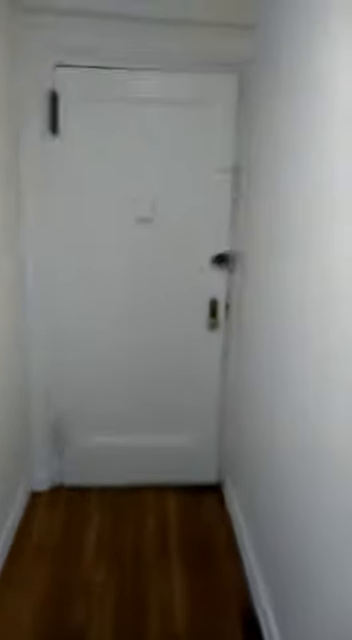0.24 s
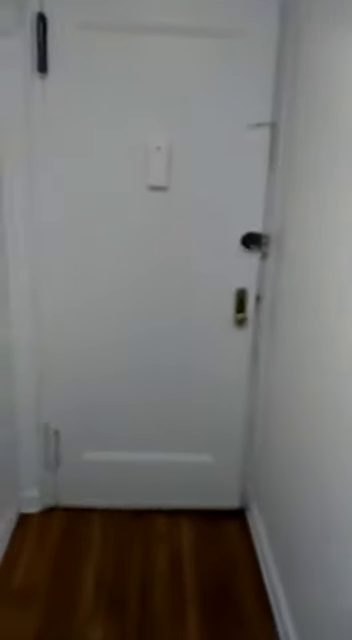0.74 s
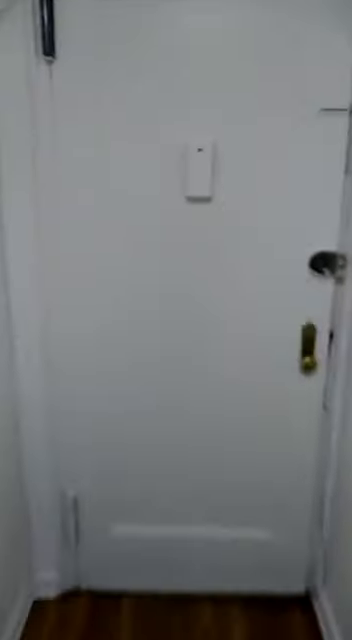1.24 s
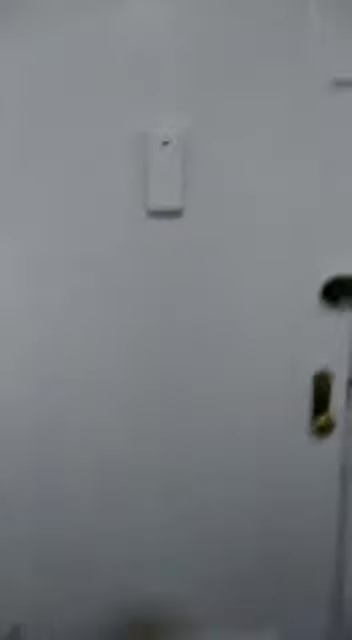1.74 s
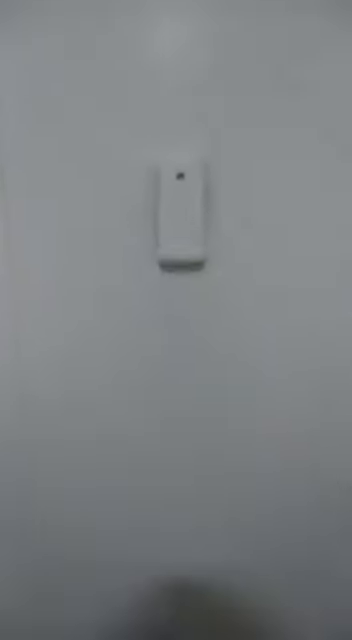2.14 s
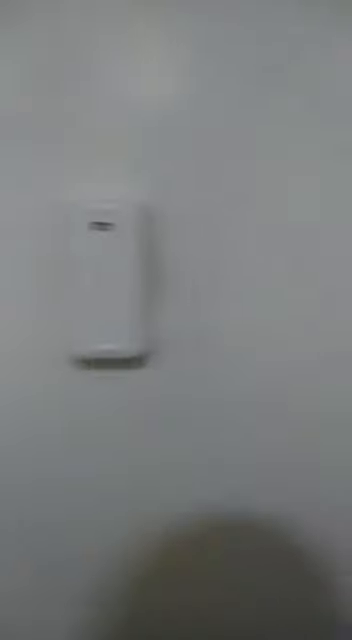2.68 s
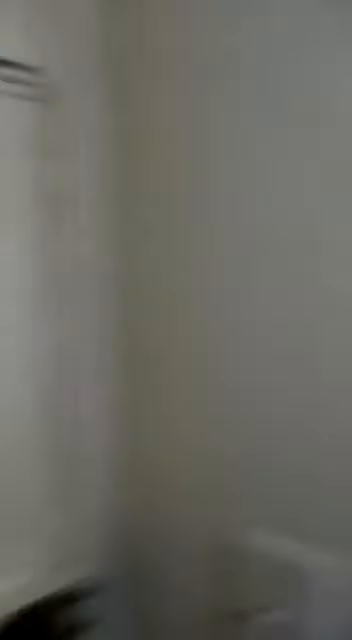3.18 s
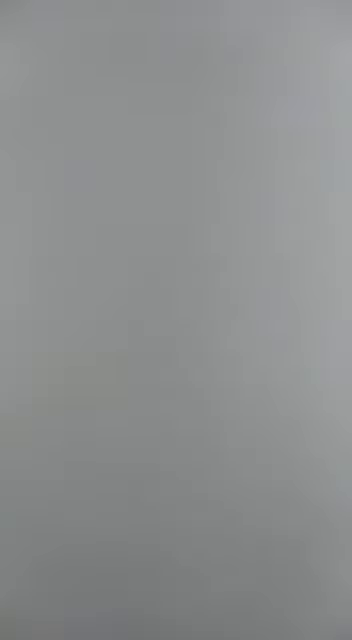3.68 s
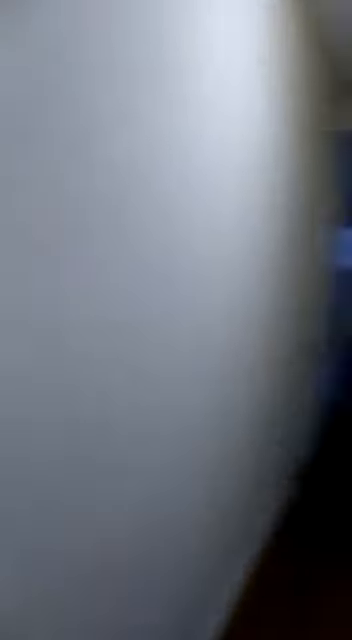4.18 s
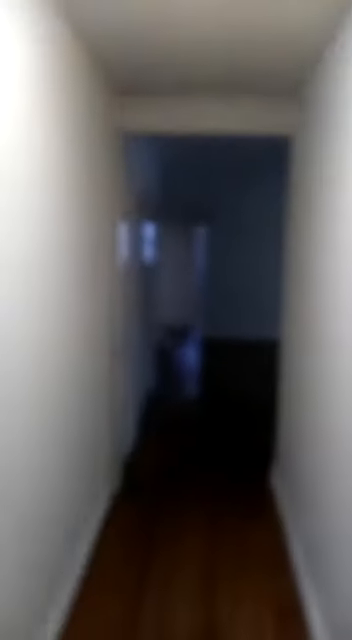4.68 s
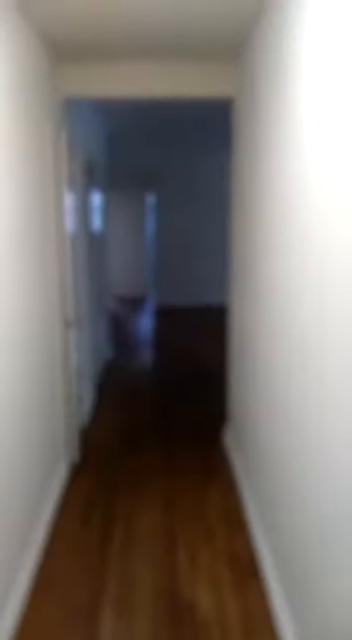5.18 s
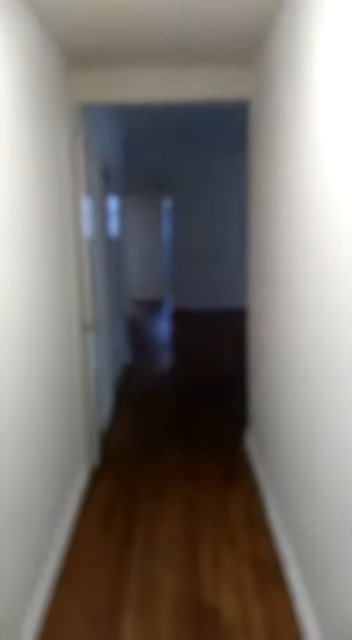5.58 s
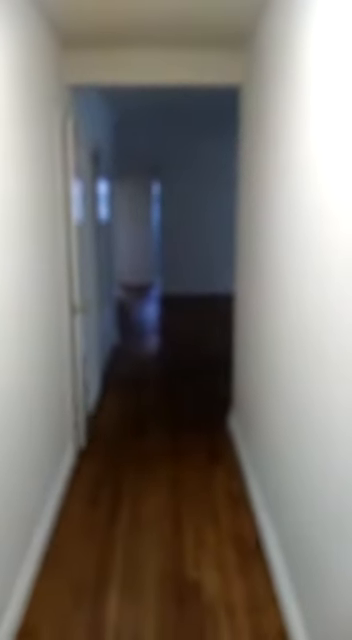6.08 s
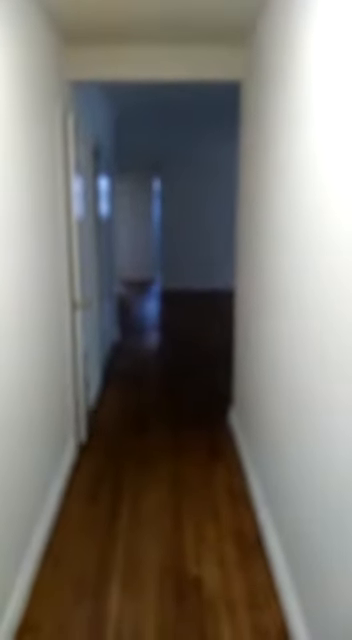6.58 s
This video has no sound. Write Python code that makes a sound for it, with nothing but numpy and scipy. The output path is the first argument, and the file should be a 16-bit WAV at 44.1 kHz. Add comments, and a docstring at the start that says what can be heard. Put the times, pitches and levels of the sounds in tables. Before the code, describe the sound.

Footsteps thump and scuff along a hardwood hallway with clinking keys, then stop; a few close clicks and a sharp metal snap follow.

```python
"""Footsteps go down a bare hardwood hallway, turn and stop; a few sharp clicks follow close by.
Each step thumps the boards with heel, then ball; the shoe knocks and scuffs, the boards crack,
clothes swish and small metal, probably keys, clinks. A finger rubs a handled object, then a metal
catch rattles and snaps, buzzing and ringing. Machinery in the building rumbles underneath."""
import sys
import numpy as np
from scipy import signal
from scipy.io import wavfile
from scipy.ndimage import uniform_filter1d

SR = 44100
rng = np.random.default_rng(int(sys.argv[2]) if len(sys.argv) > 2 else 0)


def dump(signal):
    """Clip the signal to [-1, 1] and save it as 16-bit WAV at the path in sys.argv[1]."""
    limited = np.clip(np.atleast_2d(signal).T, -1, 1)
    pcm = np.round(limited * 32767).astype(np.int16)
    wavfile.write(sys.argv[1], SR, pcm)


N = 301070
TIME = np.arange(N) / SR
HIT_TIME = TIME[:SR // 2]

# Footsteps. Each row: start in s, heel-to-ball roll in s, heel level in dB, ball level in dB,
# push pitch in Hz, heel softness (1 = usual), ball softness, floor tremor in dB.
STEPS = [(0.0, 0.086, -17.5, -25, 117, 0.21, 0.67, -47), (0.592, 0.1, -28.5, -28, 141.4, 1.07, 0.85, -43),
         (1.181, 0.108, -25.5, -24, 138, 0.83, 1.24, -40),
         (1.843, 0.12, -17.5, -30, 138.5, 1.25, 1.27, -42.5),
         (2.753, 0.043, -30.5, -20, 150.6, 0.63, 0.86, -47),
         (3.429, 0.21, -32, -23.5, 152.2, 1.2, 0.61, -45)]
# Spectrum of a contact on wood. Each row: frequency in Hz, gain in dB.
WOOD_SPECTRUM = [(40, -30.5), (100, -4), (250, 15), (355, 20), (480, 8), (720, 6.5), (1000, 3.5),
                 (1400, 3.5), (2600, -5.5), (4500, -1), (6500, -9.5), (7400, -14.5), (8200, -28.5),
                 (11000, -30), (16000, -53.5)]
# Spectrum of rubbing cloth. Each row: frequency in Hz, gain in dB.
CLOTH_SPECTRUM = [(1200, -38), (2000, -13.5), (2700, -7.5), (3600, -4), (4900, 0), (6100, -9.5),
                  (6900, -22), (7700, -24.5), (9000, -38)]


def amp(db):
    """Decibels to gain."""
    return 10 ** (np.asarray(db) / 20)


def unit_rms(x):
    """Scales to rms 1."""
    return x / np.sqrt(np.mean(x ** 2) + 1e-20)


def at_peak(x, db):
    """Scales to a peak level."""
    return amp(db) * x / abs(x).max()


def lookup(points, hz):
    """Interpolates a table on a log-frequency axis."""
    point_hz, value = np.transpose(points)
    return np.interp(np.log(hz + 1), np.log(point_hz + 1), value)


def add(mix, start_s, sound):
    """Mixes a sound in at start_s."""
    part = mix[max(round(start_s * SR), 0):][:len(sound)]
    part += sound[:len(part)]


def band_db(hz, centre_hz, octaves):
    """Bell on the octave axis: the band one contact excites."""
    return np.maximum(-6 * (np.log2((hz + 1) / centre_hz) / octaves) ** 2, -45)


def colour(x, spectrum, centre_hz=None, octaves=1):
    """Minimum-phase filter with the given spectrum, optionally weighted round a centre."""
    hz = abs(np.fft.fftfreq(8192, 1 / SR))
    db = lookup(spectrum, hz)
    if centre_hz is not None:
        db = db + band_db(hz, centre_hz, octaves)
    log_gain = np.log(amp(np.maximum(db, db.max() - 90)))
    taps = np.fft.ifft(np.exp(np.conj(signal.hilbert(log_gain)))).real
    return signal.oaconvolve(x, taps[:len(taps) // 2])[:len(x)]


def small_body(x, cutoff_hz=2200):
    """A small object radiates almost no bass."""
    return signal.sosfilt(signal.butter(8, cutoff_hz, "highpass", fs=SR, output="sos"), x)


def decay(t60_s):
    """Envelope that loses 60 dB in t60_s."""
    return np.exp(-np.log(1000) * HIT_TIME / max(t60_s, 1e-3))


def rise(t60_s):
    """Exponential attack from 0 to 1."""
    return 1 - decay(t60_s)


def swell(full_s, rise_s, hold_s, fall_db_per_s):
    """Envelope that rises until full_s, holds, then dies away."""
    attack = np.clip((TIME - full_s) / rise_s + 1, 0, 1) ** 2
    return attack * amp(-fall_db_per_s * np.maximum(TIME - full_s - hold_s, 0))


def ring(modes, detune=0):
    """Struck body: decaying sines, shifted a little by where it is hit."""
    out = np.zeros(len(HIT_TIME))
    for hz, db, t60_s in modes:
        shifted_hz = hz * (1 + detune * rng.uniform(-0.75, 1))
        out += amp(db) * decay(t60_s) * np.sin(2 * np.pi * shifted_hz * HIT_TIME)
    return out


def grit(grain_db, size=len(HIT_TIME)):
    """Friction noise: countless tiny slips of uneven size."""
    return unit_rms(rng.standard_normal(size) * amp(grain_db * np.minimum(rng.exponential(1, size), 5)))


def click(chatter_db, t60_s):
    """One hard contact, then brief chatter."""
    return signal.unit_impulse(len(HIT_TIME)) + amp(chatter_db) * grit(grain_db=4.5) * decay(t60_s)


def patchy(x, depth_db):
    """Narrow resonances come and go as the walker moves."""
    hz, _, bands = signal.stft(x, SR, nperseg=1024)
    field = uniform_filter1d(rng.standard_normal(bands.shape), size=2, axis=0)
    field = unit_rms(uniform_filter1d(field, size=10, axis=1))
    field *= np.minimum(hz / 800, 1)[:, None]  # long waves change little over a stride
    return unit_rms(signal.istft(bands * amp(depth_db * field), SR, nperseg=1024)[1][:len(x)])


def judder(x, depth_db):
    """A dragged sole or cloth catches and lets go every few milliseconds."""
    grip = unit_rms(uniform_filter1d(rng.standard_normal(len(x)), size=260))
    return unit_rms(x * amp(depth_db * grip))


def hallway(x, wet_db, t60_spread=0.063, t60_scale=0.93):
    """Adds slaps from the near walls and a tail in which some resonances outlast the rest."""
    # Reverberation. Each row: frequency in Hz, t60 in s before scaling.
    reverb_times = [(100, 0.94), (300, 0.63), (800, 0.87), (1300, 0.99), (2000, 0.68), (2800, 0.96),
                    (3800, 0.53), (4850, 0.99), (6000, 0.32), (8000, 0.46), (15000, 0.19)]
    gap_s, walls_db = 0.0046, -4
    reflections = rng.standard_normal(SR) * (rng.random(SR) < .15) * (TIME[:SR] > gap_s)
    hz, time_s, bands = signal.stft(reflections, SR, nperseg=1024)
    scatter = unit_rms(uniform_filter1d(rng.standard_normal(len(hz)), size=2))
    t60_s = t60_scale * lookup(reverb_times, hz)
    t60_s *= np.exp(t60_spread * np.minimum(hz / 1500, 1) * scatter)
    bands *= np.exp(-np.log(1000) * time_s / t60_s[:, None])
    tail = unit_rms(signal.istft(bands, SR, nperseg=1024)[1])
    tail /= np.sqrt(len(tail))
    slaps = rng.integers(int(gap_s * SR), int(.025 * SR), size=8)
    tail[slaps] += amp(walls_db) * rng.choice([-1, 1], len(slaps)) / np.sqrt(len(slaps))
    return x + amp(wet_db) * signal.oaconvolve(x, tail)[:N]


def building(rumble_db=-55, hiss_db=-72.5):
    """Machinery somewhere in the building hums and rumbles under a faint hiss."""
    # Machine hum. Each row: frequency in Hz, rms level in dB.
    tones = [(59.2, -51), (88.7, -59), (160.5, -62.5)]
    # Noise spectra. Each row: frequency in Hz, gain in dB.
    rumble_spectrum = [(20, -31), (38, 1), (50, -18), (72, 6.5), (90, -0.5), (108, -6), (125, 3.5),
                       (160, -5.5), (178, -12), (200, -24), (350, -24.5), (600, -33.5), (1500, -53)]
    hiss_spectrum = [(350, -36.5), (600, -10.5), (651, -4.5), (716, -5.5), (1120, -7), (9500, -11.5),
                     (15500, -14)]
    hum = sum(np.sqrt(2) * amp(db) * np.sin(2 * np.pi * (hz * TIME + rng.random())) for hz, db in tones)
    rumble = amp(rumble_db) * unit_rms(colour(rng.standard_normal(N), rumble_spectrum))
    hiss = amp(hiss_db) * unit_rms(colour(rng.standard_normal(N), hiss_spectrum))
    return hum + rumble + hiss


def friction(spectrum, patchy_db):
    """Continuous grainy noise at rms 1."""
    slips = patchy(grit(grain_db=2.5, size=N), patchy_db)
    return unit_rms(colour(judder(slips, depth_db=0.4), spectrum))


def floor_tremor(trim_db=-2):
    """The floor trembles after each step."""
    # Trembling boards. Each row: frequency in Hz, gain in dB.
    spectrum = [(25, -25), (50, -5), (90, 9.5), (145, 0.5), (210, 0), (280, -13), (350, -0.5), (550, -49),
                (1000, -65)]
    envelope = sum(amp(db) * swell(start_s, rise_s=0.032, hold_s=0.18, fall_db_per_s=55)
                   for start_s, *_, db in STEPS)
    return amp(trim_db) * envelope * friction(spectrum, patchy_db=0)


def slide_envelope():
    """Strength of the soles' sliding over time."""
    # Slides. Each row: time of full level in s, hold in s, level in dB.
    slides = [(0.0, 0.13, -48), (0.671, 0.24, -50.5), (1.211, 0.23, -48), (1.85, 0.2, -51.5),
              (2.691, 0.22, -52.5), (3.468, 0.024, -72)]
    return sum(amp(db) * swell(full_s, rise_s=0.052, hold_s=hold_s, fall_db_per_s=108.5)
               for full_s, hold_s, db in slides)


def clothes(sliding, slide_db=-3.5, swish_db=-1, crackle_db=-7, snaps_per_s=60):
    """Cloth swishes through the walk and with each slide; its creases snap."""
    # Rustle contour. Each row: time in s, level in dB.
    rustle = [(0.0, -54), (0.33, -58), (0.58, -53.5), (1.1, -58), (1.4, -59), (1.7, -58), (2.15, -56.5),
              (2.33, -69.5), (2.6, -68.5), (2.75, -71.5), (3.1, -61), (3.35, -98), (3.58, -63.5),
              (3.9, -84.5), (4.17, -59), (4.3, -66), (4.45, -100)]
    envelope = np.hypot(amp(np.interp(TIME, *np.transpose(rustle))), amp(slide_db) * sliding)
    impulses = (rng.random(N) < snaps_per_s / SR) * rng.uniform(0.32, 1, N)
    snaps = signal.oaconvolve(impulses, click(chatter_db=-7.5, t60_s=.008))[:N]
    crackle = amp(crackle_db) * unit_rms(colour(snaps, CLOTH_SPECTRUM))
    swish = amp(swish_db) * friction(CLOTH_SPECTRUM, patchy_db=5)
    return envelope * (crackle + swish)


def sole_shuffle(sliding, trim_db=-1):
    """Soles slide over the boards with a dull friction noise."""
    # Sliding sole. Each row: frequency in Hz, gain in dB.
    spectrum = [(50, -36), (200, -7), (400, 13), (700, -0.5), (1400, 1.5), (2200, -4.5), (3500, -59)]
    return amp(trim_db) * sliding * friction(spectrum, patchy_db=1.5)


def scuffs():
    """Soles grind and faintly squeak, clothes sweep round in the turn; each stroke swells and fades."""
    # Each row: start in s, length in s, rms before the taper in dB, centre in Hz, width in octaves.
    strokes = [(0.24, 0.15, -49, 1090, 0.61), (0.24, 0.43, -58, 396, 0.33), (0.63, 0.1, -53, 1120, 0.6),
               (0.71, 0.15, -47.5, 3740, 3.9), (1.19, 0.2, -49.5, 2500, 3.5),
               (1.215, 0.096, -52, 1430, 0.63), (1.231, 0.038, -47, 1170, 0.095),
               (1.28, 0.025, -48, 1550, 0.17), (1.295, 0.067, -63.5, 1420, 0.088),
               (1.828, 0.067, -40.5, 282, 0.52), (1.95, 0.15, -50.5, 389.5, 0.64),
               (2.075, 0.13, -52, 730, 0.97), (2.679, 0.067, -51.5, 368, 0.61),
               (3.1, 0.19, -65.5, 4800, 0.2), (3.349, 0.11, -70.5, 1247, 0.066),
               (3.411, 0.2, -45, 184, 0.33), (3.44, 0.07, -54, 458, 0.18), (3.452, 0.186, -56, 3080, 1.07),
               (3.6, 0.23, -53, 185, 0.32), (3.684, 0.25, -70, 4770, 0.047), (3.896, 0.31, -48, 3200, 1.26),
               (3.948, 0.24, -63, 870, 0.31), (4.0, 0.11, -58, 364, 0.2)]
    out = np.zeros(N)
    for start_s, length_s, db, hz, octaves in strokes:
        slips = judder(grit(grain_db=2.5), depth_db=1.5)
        stroke = unit_rms(colour(slips, WOOD_SPECTRUM, hz, octaves)[:int(length_s * SR)])
        add(out, start_s, amp(db) * stroke * signal.windows.tukey(len(stroke), .8))
    return hallway(out, wet_db=-10.5)


def key_clinks(octaves=0.95, bunch_db=-10.5, spread_db=2):
    """Keys touch and chatter; the bunch rings, and one key sounds its own note."""
    # Each row: start in s, level in dB, centre in Hz, single key's pitch in Hz, its level in dB.
    clinks = [(0.395, -35.5, 7140, 13520, -51), (0.43, -34, 7500, 10700, -56),
              (1.67, -34, 7900, 13700, -65), (1.703, -42, 7700, 7350, -55), (1.716, -32, 7800, 5380, -40.5),
              (2.176, -40, 6600, 7600, -57), (2.451, -34.5, 5400, 5006, -39.5),
              (2.515, -44, 4700, 2533, -50)]
    # Modes of the bunch. Each row: frequency in Hz, level in dB, t60 in s.
    key_modes = [(2530, -2, .4), (2961, -5, .25), (3590, -8, .2), (4570, -12, .2), (5776, 0, .22),
                 (7040, -9, .15), (7350, -7, .1), (7900, -10, .06), (10600, -17, .08), (12050, -15, .07),
                 (12700, -19, .07), (13620, -9, .1), (14450, -13, .06)]
    # Key chatter. Each row: frequency in Hz, gain in dB.
    spectrum = [(1500, -72), (2600, -1), (4000, 1), (5500, 3), (8300, -0.5), (9800, -40), (13500, -7),
                (16000, -38)]
    attack = rise(t60_s=0.0036)
    out = np.zeros(N)
    for start_s, db, centre_hz, key_hz, key_db in clinks:
        chatter = patchy(grit(grain_db=6), depth_db=6) * decay(t60_s=0.025) * attack
        touch = at_peak(colour(chatter, spectrum, centre_hz, octaves), db)
        modes = [(hz, mode_db + band_db(hz, centre_hz, octaves) + spread_db * rng.standard_normal(), t60)
                 for hz, mode_db, t60 in key_modes]
        bunch = at_peak(ring(modes, detune=0.0065), db + bunch_db)
        key = ring([(key_hz, key_db, 0.082)])
        add(out, start_s, touch + (bunch + key) * attack)
    return hallway(small_body(out), wet_db=-7.5)


def finger_rubs(stop_share=0.23):
    """A finger drags over the object in the hand, ever harder, and stops short."""
    # Each row: start in s, length in s, rms in dB, centre in Hz, width in octaves.
    rubs = [(5.256, 0.016, -60.5, 2920, 0.6), (5.417, 0.071, -47.5, 2460, 1.7),
            (5.62, 0.042, -50.5, 4830, 0.9)]
    # Finger friction. Each row: frequency in Hz, gain in dB.
    spectrum = [(400, -28), (900, 1.5), (1500, -5.5), (2200, 5), (3200, -0.5), (4400, 4), (6000, -3),
                (7200, -25), (8800, -13.5), (10000, -45)]
    out = np.zeros(N)
    for start_s, length_s, db, hz, octaves in rubs:
        progress = np.linspace(0, 1, int(length_s * SR))
        pressure = progress * np.minimum((1 - progress) / stop_share, 1)
        rub = colour(patchy(grit(grain_db=4), depth_db=4), spectrum, hz, octaves)
        add(out, start_s, amp(db) * unit_rms(rub[:len(pressure)] * pressure))
    return hallway(out, wet_db=-15, t60_spread=.06, t60_scale=0.56)


def plastic_taps():
    """Small sharp clicks of something handled close by."""
    # Each row: start in s, peak in dB, centre in Hz, width in octaves.
    taps = [(0.8408, -23, 7500, 1.9), (2.1002, -31.5, 422, 1.13), (5.278, -26.5, 2620, 1.4),
            (5.2821, -17, 2260, 1.4), (5.288, -32, 4000, 3), (5.616, -43.5, 2570, 0.14),
            (6.213, -41, 7920, 0.3), (6.239, -31, 8100, 0.41), (6.2413, -28, 7830, 0.5),
            (6.2527, -30.5, 7560, 0.37), (6.309, -46, 6080, 0.11), (6.624, -55.5, 8030, 0.05),
            (6.679, -56.5, 740, 0.42), (6.707, -55, 8070, 0.06)]
    # Tapped plastic. Each row: frequency in Hz, gain in dB.
    spectrum = [(150, -6), (400, 4.5), (850, 2), (1200, -19), (1700, -1.5), (2300, 3), (3000, 2), (3800, 4),
                (5100, 2), (6300, -9.5), (8000, -9), (10000, -15.5), (11700, -16), (13000, -40),
                (16000, -31)]
    out = np.zeros(N)
    for start_s, db, hz, octaves in taps:
        tap = colour(click(chatter_db=-18.5, t60_s=0.011), spectrum, hz, octaves)
        add(out, start_s, at_peak(tap, db))
    return hallway(out, wet_db=-11.5, t60_spread=0.089, t60_scale=0.49)


def catch_rattle():
    """Pressed and let go, the catch ticks against its housing, ringing it differently each time."""
    # Each row: start in s, level in dB.
    ticks = [(5.998, -54), (6.027, -46), (6.037, -48.5), (6.048, -44.5), (6.057, -40.5), (6.069, -36.5),
             (6.082, -47.5), (6.679, -43)]
    # Each row: frequency in Hz, level in dB, t60 in s.
    housing_modes = [(2700, -14, 0.051), (3316, -6, .04), (3480, -1.5, 0.028), (3780, 5.5, 0.024),
                     (4270, -0.5, 0.021), (4870, -5.5, 0.045), (5540, -3, 0.062), (6450, -6.5, 0.02),
                     (7490, -4.5, 0.03), (7900, -8.5, .03), (10160, -14.5, .025), (11160, -17.5, 0.028)]
    out = np.zeros(N)
    for start_s, db in ticks:
        tick = signal.oaconvolve(click(chatter_db=-6, t60_s=0.017), ring(housing_modes, detune=0.015))
        add(out, start_s, at_peak(tick, db))
    return hallway(small_body(out), wet_db=-11.5, t60_scale=0.41)


def catch_snap(buzz_db=-40.5, buzz_t60_s=0.31):
    """A metal catch slips, snaps and rebounds; the hardest blow rings it and buzzes its loose parts."""
    # Each row: start in s, peak in dB.
    blows = [(6.0971, -20), (6.1011, -6), (6.109, -16.5), (6.1088, -14.5)]
    # Each row: frequency in Hz, gain in dB.
    blow_spectrum = [(200, -35), (900, -36), (1300, -39), (1750, -39.5), (2200, -5.5), (2700, -17.5),
                     (3500, -10.5), (4200, -4.5), (5100, -8.5), (5700, -2), (6600, -9), (7600, -6.5),
                     (9000, -28), (11200, -12.5), (12500, -27), (15700, -25)]
    buzz_spectrum = [(1700, -34), (2300, -5), (4000, -13), (5800, 4), (8000, 1), (9500, -5.5),
                     (12000, -4.5), (14000, -8), (16000, -10.5)]
    # Each row: frequency in Hz, level in dB, t60 in s.
    housing_modes = [(2380, -23, 0.023), (3614, -4.5, 0.0085), (4240, -14, 0.0067)]
    catch_modes = [(5655, -23, .025), (6540, -18, .025), (7490, -26, .075), (10050, -47, .15),
                   (12730, -38, .11), (15720, -37, .13), (5012, -43, .52)]
    impact, metal = np.zeros((2, N))
    for start_s, db in blows:
        blow = colour(click(chatter_db=-11, t60_s=0.02), blow_spectrum)
        add(impact, start_s, at_peak(blow, db))
    hardest_s = max(blows, key=lambda row: row[1])[0]
    add(impact, hardest_s, small_body(ring(housing_modes)))
    add(metal, hardest_s, small_body(ring(catch_modes)))
    buzz = unit_rms(colour(grit(grain_db=3), buzz_spectrum))
    add(metal, hardest_s, amp(buzz_db) * buzz * decay(buzz_t60_s))
    return hallway(impact, wet_db=-28, t60_scale=0.83) + metal


def wood_hits(hits, envelope, patchy_db, trim_db):
    """Short bursts of slips, coloured by the wood and by the resonances of the spot hit."""
    out = np.zeros(N)
    for start_s, db, hz, octaves in hits:
        burst = patchy(grit(grain_db=4), patchy_db) * envelope
        add(out, start_s, at_peak(colour(burst, WOOD_SPECTRUM, hz, octaves), db + trim_db))
    return out


def board_cracks(octaves=0.95):
    """Boards crack briefly under the shifting weight."""
    # Each row: start in s, level in dB, centre in Hz.
    cracks = [(0.0452, -26.5, 5400), (0.065, -28.5, 4500), (0.585, -33, 5700), (0.7283, -18.5, 3450),
              (0.747, -26, 5450), (1.0345, -41, 3600), (1.104, -45, 4200), (1.184, -27.5, 2980),
              (1.197, -26.5, 6500), (1.234, -34, 2390), (1.5253, -30, 6900), (1.746, -35.5, 3580),
              (1.752, -22.5, 3130), (2.011, -32, 3400), (2.379, -42, 5100), (2.665, -25.5, 3930),
              (2.798, -29.5, 4380), (2.8668, -22.5, 4380), (3.0, -28, 4500), (3.048, -27.5, 5500),
              (3.0893, -32.5, 6600), (3.462, -37, 3930), (3.4659, -22, 3500), (3.525, -27.5, 3970),
              (3.533, -30, 4000)]
    hits = [(*row, octaves) for row in cracks]
    envelope = rise(t60_s=0.0033) * decay(t60_s=0.035)
    return hallway(wood_hits(hits, envelope, patchy_db=4.5, trim_db=-5), wet_db=-5.5)


def shoe_knocks():
    """Heel and sole knock on the wood."""
    # Each row: start in s, level in dB, centre in Hz, width in octaves.
    knocks = [(0.002, -26, 426, 2.3), (0.083, -25.5, 934, 0.86), (0.729, -20.5, 2870, 3.2),
              (0.738, -25.5, 1530, 0.6), (0.743, -28, 413, 1.3), (1.18, -25, 423, 2.2),
              (1.283, -26, 1700, 0.89), (1.839, -26, 2460, 1.1), (1.956, -36, 1340, 0.8),
              (2.794, -24, 972, 1.4), (3.287, -42, 1000, 0.55), (3.805, -45.5, 1060, 0.47),
              (4.409, -44, 630, 0.51), (5.055, -47.5, 470.5, 0.67)]
    envelope = rise(t60_s=0.01) * decay(t60_s=0.099)
    return hallway(wood_hits(knocks, envelope, patchy_db=2, trim_db=-5.5), wet_db=-7)


def joist_booms(t60_s=0.8):
    """Under the walker's full weight the floor sags on its joists and booms."""
    # Each row: start in s, peak in dB, pitch in Hz.
    booms = [(1.3, -48, 73), (2.101, -41.5, 63), (2.793, -34.5, 70.8)]
    out = np.zeros(N)
    for start_s, db, hz in booms:
        add(out, start_s, at_peak(ring([(hz, 0, t60_s)]) * rise(t60_s=0.14), db))
    return out


def foot_thuds(boards_db=8.5, trim_db=-2):
    """The foot gives a damped push and rings a board; a soft tread builds and fades more slowly."""
    # Floorboard modes. Each row: frequency in Hz, level in dB, t60 in s.
    board_modes = [(91.6, -6, 0.37), (129, -13.5, 0.2), (143.96, -1, 0.43), (162, 5, 0.055),
                   (204.8, -4.5, 0.23), (267, -6.5, 0.13), (282.6, -11.5, 0.033), (352, -7.5, 0.33),
                   (434, -13, 0.17)]
    # Light shifts of weight. Each row: start in s, level in dB, push pitch in Hz, softness.
    shifts = [(0.566, -35, 137, 1.3), (2.527, -42.5, 202, 0.76), (3.207, -39, 140, 0.73),
              (4.042, -40.5, 154.6, 1.15), (4.26, -38.5, 142, 1.7), (5.053, -43.5, 265, 0.78)]
    heels = [(start_s, db, hz, soft) for start_s, _, db, _, hz, soft, _, _ in STEPS]
    balls = [(start_s + roll_s, db, hz, soft) for start_s, roll_s, _, db, hz, _, soft, _ in STEPS]
    out = np.zeros(N)
    for start_s, db, push_hz, softness in heels + balls + shifts:
        swing = np.sin(2 * np.pi * push_hz * HIT_TIME)
        push = swing * decay(t60_s=0.092 * softness) * rise(t60_s=0.1 * softness)
        octaves = 3.9 / max(softness, 1)
        modes = [(hz, mode_db + band_db(hz, push_hz, octaves), t60_s * min(softness, 1))
                 for hz, mode_db, t60_s in board_modes]
        strike = swing * decay(t60_s=0.0041)
        board = signal.oaconvolve(strike, ring(modes, detune=.04))[:len(push)]  # boards vary in pitch
        sole_cushion = rise(t60_s=0.039 * softness ** 2)
        thud = (at_peak(push, 0) + at_peak(board, boards_db)) * sole_cushion
        add(out, start_s, at_peak(thud, db + trim_db))
    return hallway(out, wet_db=-6)


def suppress_noise(x, depth_db=7, open_db=9.5, knee_db=1.27, from_hz=300):
    """Above the bass, bands near the noise floor are turned down, which cuts tails short."""
    hz, _, bands = signal.stft(x, SR, nperseg=512)
    power = uniform_filter1d(uniform_filter1d(abs(bands) ** 2, size=3, axis=0), size=9, axis=1)
    level_db = 10 * np.log10(abs(power) + 1e-20)
    over_floor_db = level_db - np.percentile(level_db, 15, axis=1, keepdims=True)
    shut = .5 - .5 * np.tanh((over_floor_db - open_db) / (2 * knee_db))
    above_bass = np.minimum(hz / from_hz, 1)[:, None] ** 4
    return signal.istft(bands * amp(-depth_db * shut * above_bass), SR, nperseg=512)[1][:N]


def scene():
    """All sources in the hallway, one channel."""
    sliding = slide_envelope()
    steps = shoe_knocks() + board_cracks() + foot_thuds() + joist_booms() + floor_tremor()
    movement = key_clinks() + scuffs() + clothes(sliding) + sole_shuffle(sliding)
    handling = finger_rubs() + plastic_taps() + catch_snap() + catch_rattle()
    return (steps + movement + handling + building())[None]


def record(dry):
    """Peak clipping, noise suppression and band limit."""
    cutoff_hz = 16400
    clipped = np.clip(dry[0], -.97, .97)
    lowpass = signal.firwin(255, cutoff_hz, window=("kaiser", 8), fs=SR)
    return signal.oaconvolve(suppress_noise(clipped), lowpass, "same")[None]


dry = scene()
out = record(dry)
dump(out)
```